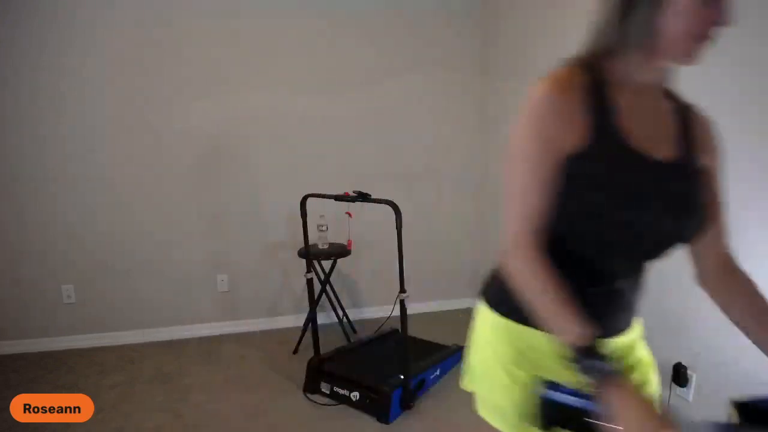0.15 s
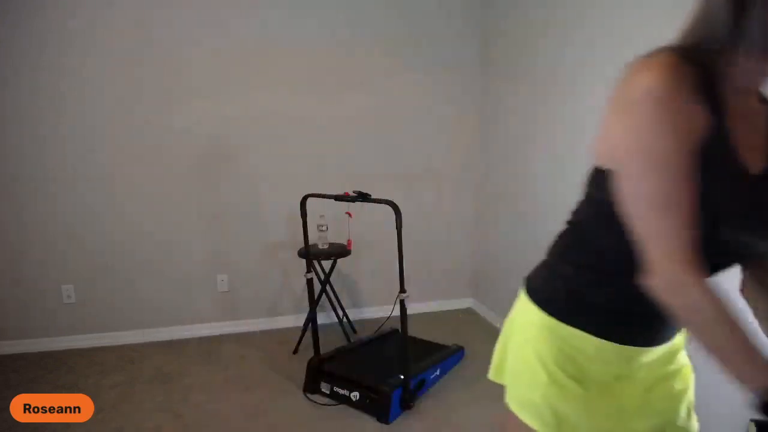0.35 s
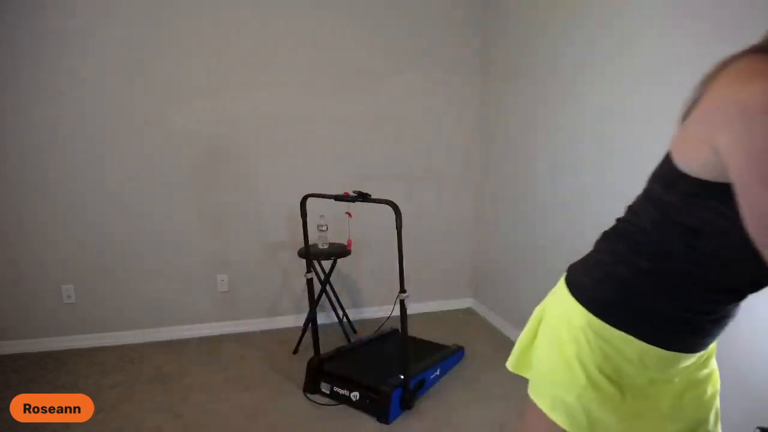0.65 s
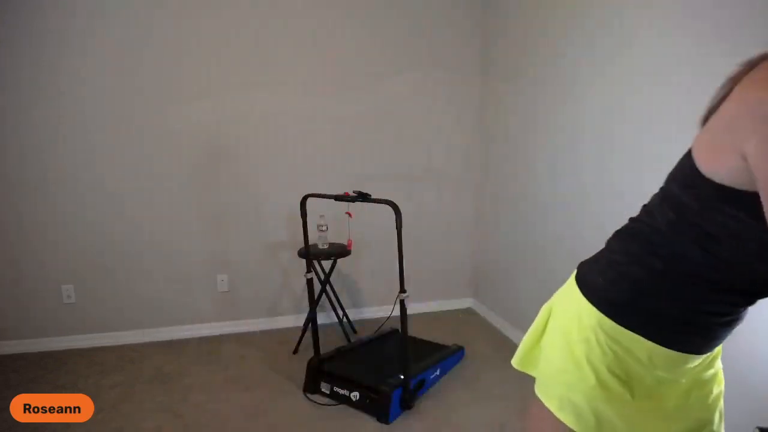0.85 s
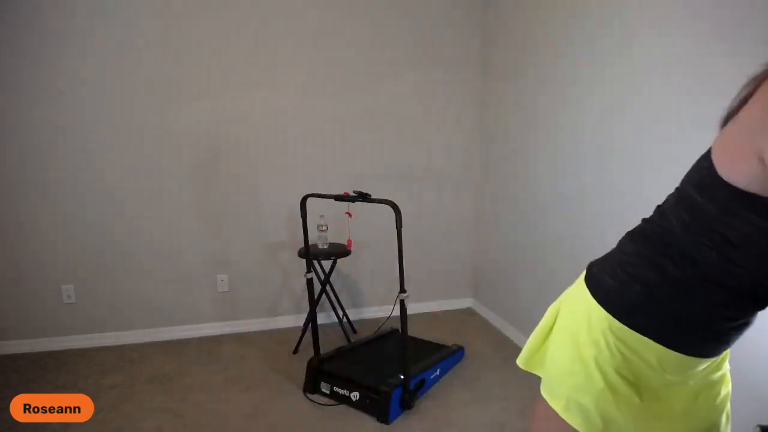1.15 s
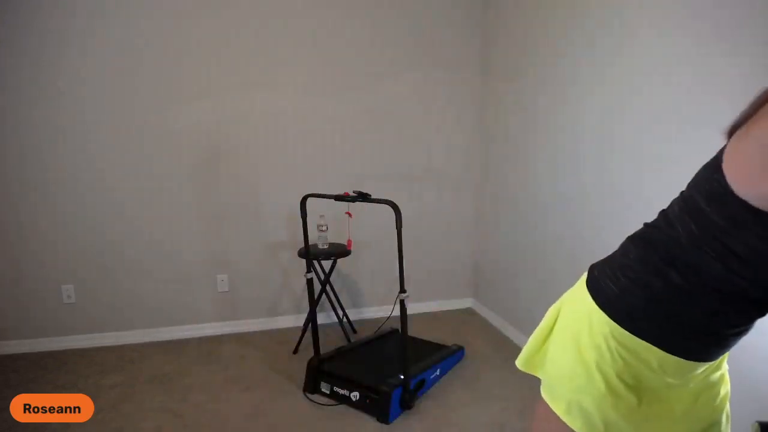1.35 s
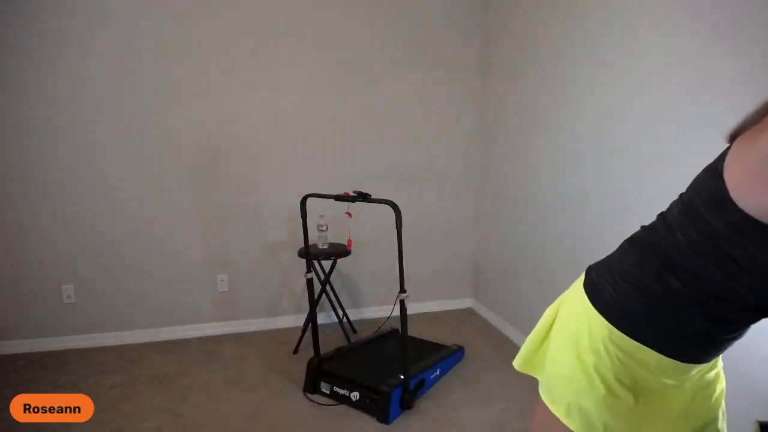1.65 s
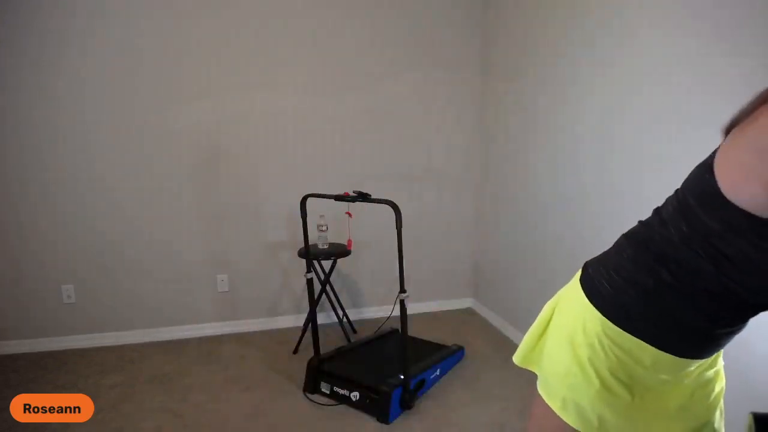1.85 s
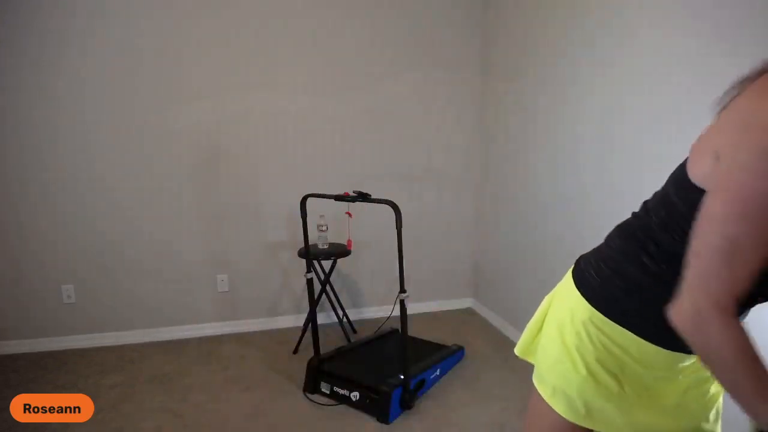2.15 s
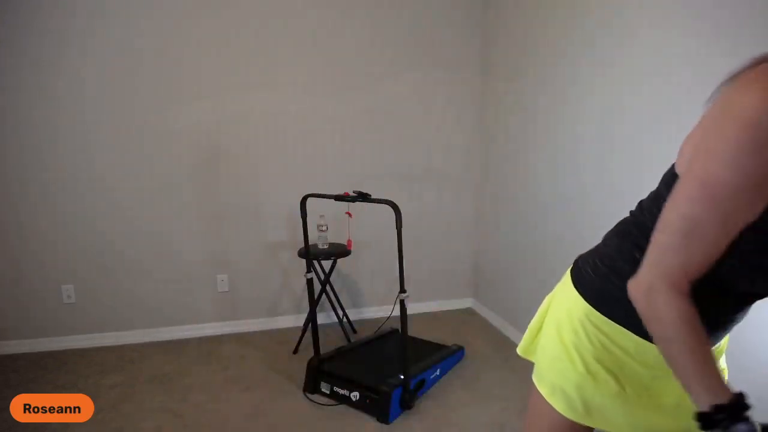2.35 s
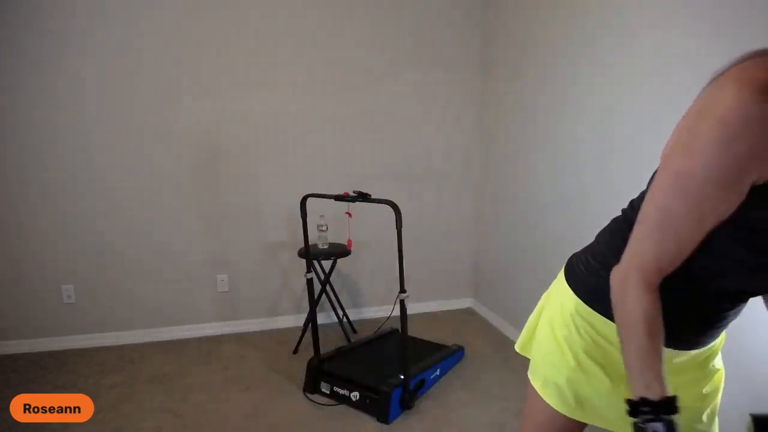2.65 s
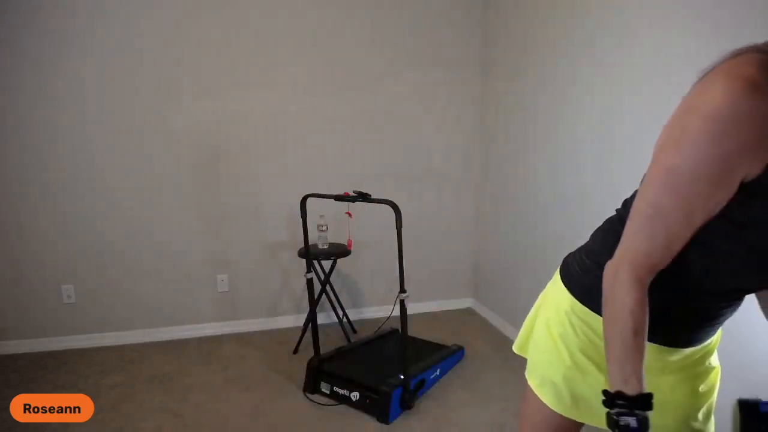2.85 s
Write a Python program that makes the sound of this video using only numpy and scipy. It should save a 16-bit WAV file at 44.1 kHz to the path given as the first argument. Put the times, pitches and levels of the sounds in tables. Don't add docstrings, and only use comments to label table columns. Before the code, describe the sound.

Small metal dumbbells clatter onto a steel rack in a bare room: near silence, then about seven hard clanging landings with bounces and rattles, ringing bars, and an abrupt fade, heard through a limited laptop microphone.

```python
import sys
import numpy as np
from scipy import signal
from scipy.io import wavfile

SR = 44100
rng = np.random.default_rng(int(sys.argv[2]) if len(sys.argv) > 2 else 0)


def digitize_waveform(pressure):
    field = np.atleast_2d(pressure).T
    bounded = np.clip(field, -1, 1)
    quanta = np.round(bounded * 32767).astype(np.int16)
    wavfile.write(sys.argv[1], SR, quanta)


def convert_level_to_amplitude(level_db):
    exponent = np.asarray(level_db, float) / 20
    return 10 ** exponent


N = 132300

# start_s, peak_db, then relative to it thud_db, body_db, brightness_db
KNOCKS = [(0.414, -7, -11.5, -10.5, -44), (0.42, -4, -8, -17.5, -13), (0.457, 7.5, -18, -20, -21.5),
          (0.465, -5, -44, -35, -5), (0.509, 1, -25, -35, -35), (0.546, -8, -38, -5.5, -14.5),
          (0.624, -6, -21, -13, -20.5), (0.666, -1.5, -46, -15, -21.5), (0.709, -29, -33.5, -28, -45),
          (0.783, 6.5, -15.5, -15, -18), (0.834, -15.5, -50, -10, -36), (0.891, -5, -18, -13, -16),
          (0.959, -23, -8, 2, -10), (1.065, -5, -32, -7, -18.5), (1.067, -4, -20, -8.5, -17.5),
          (1.207, -11.5, -22.5, -11, -22.5), (1.255, -13.5, -5.5, -4, -13), (1.295, -3.5, -12.5, -12, -12),
          (1.339, 3, -28.5, -7, -13), (1.362, 3.5, -16, -25, -13.5), (1.401, -3.5, -28.5, -16.5, -16),
          (1.46, -8, -15, -6.5, -17), (1.549, -8, -22.5, -10, -21), (1.581, -12, -11, -8, -18)]
# start_s, peak_db, then relative to it thud_db, body_db, brightness_db
LATE_KNOCKS = [(1.61, 1.5, -19.5, -6.5, -12.5), (1.661, -4, -17, -9.5, -12.5),
               (1.695, 1.5, -19.5, -13, -17), (1.719, -24, -28, -22, -34), (1.779, -29, -38, -14, -45),
               (1.889, -22, -51, 1, -21), (1.91, -16, -28.5, -5, -80), (1.954, -28, -4.5, -19, -19),
               (1.987, -2.5, -16.5, -17, -19), (2.039, -2, -20, -13.5, -19), (2.064, 6.5, -42, -19, -15),
               (2.132, -8, -22, -26, -44), (2.211, -8, -21, -22, -34.5), (2.317, -15.5, -39, -7.5, -45),
               (2.342, -24, -15.5, -13, -26), (2.38, -4.5, -23.5, -8, -20.5), (2.393, 5, -18.5, -21, -17.5),
               (2.424, 4, -25.5, -19.5, -15.5), (2.472, 6, -31, -13.5, -21),
               (2.519, 6.5, -21.5, -16.5, -19), (2.565, -11.5, -32, -16.5, -9),
               (2.599, -7, -46, -16.5, -39), (2.654, -17, -38.5, -7, -31.5), (2.727, -15, -15.5, -8.5, -44)]
# start_s, peak_db, then relative to it thud_db, body_db, brightness_db
SHUFFLES = [
    (0.04, -37.5, -10, -13, -17),
    (0.09, -46.5, -15, -13, -6),
    (0.15, -50, -19, -16, 0),
    (0.19, -39.5, -21, -18, -5.5),
]
MEAN_THUD_DB, MEAN_BODY_DB, MEAN_BRIGHT_DB = -22, -13.5, -22
THUD_HZ, BODY_HZ, BODY_OCTAVES, BRIGHT_HZ = 410, 650, 0.67, 4100
SHUFFLE_SWELL_S = 0.01

# pitch_hz, level_db (per Hz)
CRASH_COLOUR = [(35, -56), (70, -36), (216, -5.5), (1220, -6.5), (1540, -2), (2950, -7), (3390, -14.5),
                (4290, -18.5), (15800, -52)]
# pitch_hz, t60_s
ROOM_T60 = [(100, 0.42), (260, 0.29), (700, 0.39), (1840, .42), (4850, 0.3), (12800, 0.26)]
CRASH_DB, CRACK_DB, CRACK_S = -11, -14.5, 0.0026
BUILD_S, BASS_BUILD_CYCLES = 0.0032, 0.41
TICKS_PER_S, TICK_SPREAD_DB = 300, 1.8
GRAIN_DB, PATCH_DB = 0.5, 2

# pitch_hz, level_db, t60_s
RACK_BARS = [(385, -19, 0.44), (648.7, -5.5, 0.21), (737, -4.5, 0.22), (1134, -11, 0.37), (1471, -2, 0.31),
             (1516, -2.5, 0.21), (1562, -2.5, 0.28), (1638, -4.5, 0.25), (1695, -9.5, 0.13),
             (2032, -3.5, 0.35), (2225, 0, 0.14), (2765, -18, 0.58), (2885, -7, 0.14), (3000, -9, 0.19),
             (4183, -14, 0.23)]
RACK_DB, BAR_SCATTER_DB, RATTLE_S, RINGING_SHARE = -20, -0.5, 0.032, 0.69

# start_s, peak_db, pitch_hz
CLACKS = [(0.6284, -11.7, 1670), (1.0716, -5.0, 960), (1.2958, -11.3, 1360), (1.3101, -8.1, 830),
          (1.3971, -4.1, 1730), (1.408, -3.1, 1700), (1.4905, -9.7, 2090), (1.6195, -2.1, 780),
          (1.6673, -4.4, 1500), (1.9937, -10.8, 930), (2.0027, -7.9, 1870), (2.4003, -2.2, 1960),
          (2.5578, -3.1, 1940), (2.608, -6.9, 1830)]
CLACK_DB, CLACK_CYCLES, CLACK_RISE_CYCLES = -1.5, 7.0, 0.22

# start_s, pitch_hz, level_db,
# t60_s
PINGS = [(0.1, 1408, -58, 1.5), (0.205, 2440, -50, 0.3), (0.556, 4176, -20, 0.3), (0.65, 222, -31, 0.5),
         (0.925, 1974, -16, 0.84), (1.068, 690, -10, 0.07), (1.085, 2880, -22, 0.22),
         (1.483, 4180, -27, 0.21), (1.49, 1975, -21.5, 0.89), (1.575, 4180, -28.5, 0.57),
         (1.52, 3010, -29, 0.78), (2.045, 4183, -16, 0.07), (2.043, 3031, -9, 0.15),
         (2.134, 4183, -21, 0.2), (2.165, 3031, -26, 0.48), (2.17, 2003, -22, 1.5), (2.22, 6272, -54, 1.3),
         (2.423, 4183, -20, 0.17), (2.518, 4183, -10, 0.069), (2.52, 2885, -16.5, 0.44),
         (2.728, 4183, -38, 0.083), (2.765, 6272, -60, 0.3), (1.072, 610, -13, 0.1), (0.66, 1600, -21, .4),
         (2.63, 4183, -32, .06), (2.82, 4183, -55, .2), (2.77, 6272, -78, 2.5), (2.588, 4183, -22, .08),
         (2.071, 6950, -24, .1), (2.49, 2230, -12, .15), (2.19, 6272, -56, .8), (2.685, 1990, -33, .6),
         (1.614, 3000, -12, .06),
         (0.465, 1602, -14.5, 0.48),
    (0.462, 2854, -12, 0.34),
    (1.72, 1996, -30, 1.5),
    (2.002, 1529, -14, .8),
    (2.066, 2225, -5.5, 0.12),
    (2.211, 1570, -23, 0.18),
    (2.40, 1575, -14.5, 0.79),
    (2.562, 2973, -20.5, 0.46),
]
# start_s, pitch_hz, level_db, t60_s
THUMPS = [(0.42, 200, -18, .15), (0.785, 310, -12, .15), (0.8, 160, -20, .25), (0.787, 590, -14, .15),
          (0.79, 1000, -14, .15), (1.07, 250, -24, .2), (1.617, 850, -13, .15), (1.617, 1010, -15, .12),
          (1.617, 231, -20, .2), (2.07, 740, -16, .15), (0.29, 205, -58, .2)]
# start_s, pitch_hz, level_db, t60_s
LAST_PAIR = [
    (2.758, 1987, -30, .8),
    (2.758, 1998.4, -34, .8),
]
CHOKES = [
    0.785,
    1.066,
    1.34,
    1.613,
    1.99,
    2.39,
    2.8,
    9,
]
CHOKE_S, PING_BUILD_S, PING_WAVER_DB = 0.03, 0.0013, 2.5

# start_s, level_db, pitch_hz
FLASHES = [(0.459, -13, 2780), (0.477, -13, 2050), (0.515, -16, 2020), (0.535, -17, 2050),
           (0.668, -19, 2110), (0.78, -16, 1680), (0.79, -19, 2130), (0.794, -15, 2500), (1.339, -17, 1590),
           (1.359, -16, 3040), (1.369, -17, 1570), (1.399, -20, 3060), (1.61, -17, 1360),
           (1.658, -19, 2170), (1.704, -17, 2200), (1.71, -15, 1570), (2.063, -20, 2610),
           (2.069, -11, 2220), (2.391, -14, 2260), (2.416, -20, 4180), (2.42, -19, 2730),
           (2.432, -16, 1720), (2.448, -19, 2760), (2.476, -19, 3060), (2.49, -13, 2240), (2.49, -17, 730),
           (2.516, -12, 2890), (2.536, -12, 1530), (2.556, -14, 3040), (2.564, -13, 1530)]
FLASH_S, FLASH_DB = 0.009, 1.5

# start_s, level_db
GATE = [
    (2.76, 0.5),
    (2.871, 2),
    (2.931, -7),
    (3.0, -23.5),
]
# pitch_hz, level_db (peak)
HUM = [(120, -61.5)]
# pitch_hz, level_db (per Hz)
ROOM_TONE = [(18, -53), (30, -24), (1030, -6.5), (1160, -17), (1540, 4.5), (1690, -5), (9000, -21),
             (11700, -83), (19800, -120)]
ROOM_TONE_DB, TONE_ROLL_DB = -66.5, 12.5
CEILING, MIC_LOW_HZ, MIC_TOP_HZ = 1.3, 106, 15800


def at_hz(points, hz):
    table = np.array(points)
    return np.interp(np.log(hz), np.log(table[:, 0]), table[:, 1])


def train(s, values):
    return np.bincount((np.asarray(s) * SR).astype(int), values, N)[:N] + 1e-18


def fade(x, tau_s):
    return signal.lfilter([1], [1, -np.exp(-1 / (tau_s * SR))], x)


def smooth(x, tau_s):
    return fade(x, tau_s) * (1 - np.exp(-1 / (tau_s * SR)))


def wander(tau_s):
    x = smooth(smooth(rng.standard_normal(N), tau_s), tau_s)
    return x / x.std()


def ring(x, hz, t60):
    shrink = convert_level_to_amplitude(-60 / (t60 * SR))
    turn = 2 * np.pi * hz / SR
    return signal.lfilter([0, np.sin(turn)], [1, -2 * shrink * np.cos(turn), shrink * shrink], x)


def bands(gain):
    edges = 25 * 2 ** np.arange(0, 9.6, 1 / 3)
    white = rng.standard_normal((2, N))
    total = 0
    for k, (low, high) in enumerate(zip(edges, edges[1:])):
        sos = signal.butter(2, [low, high], "band", fs=SR, output="sos")
        total = total + gain(np.sqrt(low * high)) * signal.sosfilt(sos, white[k % 2])
    return total


def colour_db(hz):
    s, db, thud, body, bright = np.transpose(SHUFFLES + KNOCKS + LATE_KNOCKS)
    low = 1 / (1 + (hz / THUD_HZ) ** 4)
    middle = np.exp(-0.5 * (np.log2(hz / BODY_HZ) / BODY_OCTAVES) ** 2)
    high = 1 / (1 + (BRIGHT_HZ / hz) ** 4)
    db = db + low * (thud - MEAN_THUD_DB)
    db = db + middle * (body - MEAN_BODY_DB)
    return s, db + high * (bright - MEAN_BRIGHT_DB)


def contacts(s, db):
    count = len(SHUFFLES)
    energy = convert_level_to_amplitude(2 * db)
    sudden = train(s[count:], energy[count:])
    soft = train(s[:count], energy[:count])
    return sudden + smooth(smooth(soft, SHUFFLE_SWELL_S), SHUFFLE_SWELL_S)


def echoing(hits, hz):
    build = BUILD_S + BASS_BUILD_CYCLES / hz
    tail = fade(hits, at_hz(ROOM_T60, hz) / (6 * np.log(10)))
    return smooth(smooth(tail, build), build)


def crash():
    grain = wander(0.0027)
    tick_db = TICK_SPREAD_DB * np.minimum(rng.exponential(1, N), 2)
    ticks = (rng.random(N) < TICKS_PER_S / SR) * convert_level_to_amplitude(2 * tick_db)
    ticks = 1 + fade(ticks, CRACK_S)

    def gain(hz):
        s, db = colour_db(hz)
        hits = contacts(s, db)
        room = convert_level_to_amplitude(2 * CRASH_DB) * echoing(hits, hz)
        crack = convert_level_to_amplitude(2 * CRACK_DB) * smooth(fade(hits, CRACK_S), 2 / hz)
        ticking = smooth(ticks, 1 / hz) / ticks.mean()
        level = convert_level_to_amplitude(at_hz(CRASH_COLOUR, hz) + GRAIN_DB * grain + PATCH_DB * wander(0.016))
        return level * np.sqrt((room + crack) * ticking)

    return 3.23 * bands(gain)


def rack():
    bars = RACK_BARS
    scatter = rng.standard_normal((len(SHUFFLES + KNOCKS + LATE_KNOCKS), len(bars)))
    out = 0
    for k, (hz, level_db, t60) in enumerate(bars):
        s, db = colour_db(hz)
        db = db + level_db + RACK_DB + BAR_SCATTER_DB * scatter[:, k]
        drive = np.sqrt(echoing(contacts(s, db), hz))
        rattle = rng.standard_normal(N) * np.sqrt(2 / (RATTLE_S * SR))
        out = out + ring(drive * rattle, hz, t60 * RINGING_SHARE)
    return out


def clacks():
    out, t = np.zeros(N), np.arange(SR // 50) / SR
    signs = rng.choice([-1, 1], len(CLACKS))
    for (s, db, hz), sign in zip(CLACKS, signs):
        i, cycles = int(s * SR), hz * t
        rise = 1 - np.exp(-(cycles / CLACK_RISE_CYCLES) ** 2)
        level = convert_level_to_amplitude(db + CLACK_DB - 60 * cycles / CLACK_CYCLES)
        out[i:i + len(t)] += sign * rise * level * np.sin(2 * np.pi * cycles)
    return out


def pings():
    out, now = np.zeros(N), np.arange(N) / SR
    for s, hz, db, t60 in PINGS + THUMPS + LAST_PAIR:
        t = np.maximum(now - s, 0)
        waver_db = PING_WAVER_DB / (1 + t60 ** 2)
        choke = 1
        if s > LAST_PAIR[0][0] - 0.01:
            waver_db = 0
        else:
            next_weight = min(c for c in CHOKES if c > s + 0.02)
            choke = np.exp(-np.maximum(now - next_weight, 0) / CHOKE_S)
        level = convert_level_to_amplitude(db - 60 * t / t60 + waver_db * wander(0.0029))
        soft_start = 1 - np.exp(-t / (PING_BUILD_S * (1 + 10 * t60 ** 2)))
        out += level * choke * soft_start * np.sin(2 * np.pi * hz * t)
    return out


def flashes():
    out, t = np.zeros(N), np.arange(SR // 12) / SR
    swell = t / FLASH_S * np.exp(1 - t / FLASH_S)
    for s, db, hz in FLASHES:
        i = int(s * SR)
        out[i:i + len(t)] += convert_level_to_amplitude(db + FLASH_DB) * swell * np.sin(2 * np.pi * hz * t)
    return out


def background():
    t = np.arange(N) / SR
    tone = bands(lambda hz: convert_level_to_amplitude(at_hz(ROOM_TONE, hz) - TONE_ROLL_DB * np.log2(1 + hz / 2000)))
    hum = sum(convert_level_to_amplitude(db + 2.5 * wander(0.02)) * np.sin(2 * np.pi * hz * t) for hz, db in HUM)
    return hum + convert_level_to_amplitude(ROOM_TONE_DB) * tone / tone.std()


def scene():
    gate = convert_level_to_amplitude(np.interp(np.arange(N) / SR, *np.transpose(GATE)))
    clatter = gate * (crash() + rack())
    mix = clatter + clacks() + pings() + flashes() + background()
    return mix[None]


def band_limit(x):
    return signal.sosfilt(signal.butter(12, 15980, fs=SR, output="sos"), x)


def record(dry):
    x = CEILING * np.tanh(dry / CEILING)
    x = signal.sosfilt(signal.butter(2, MIC_LOW_HZ, "high", fs=SR, output="sos"), x)
    x = signal.sosfilt(signal.ellip(10, 1, 50, MIC_TOP_HZ, fs=SR, output="sos"), x)
    mix = np.clip(x, -1, 1)
    return band_limit(mix)


dry = scene()
out = record(dry)
digitize_waveform(out)
```